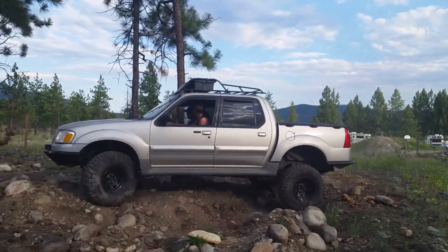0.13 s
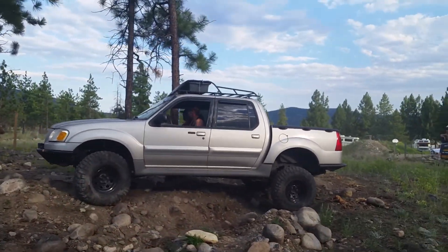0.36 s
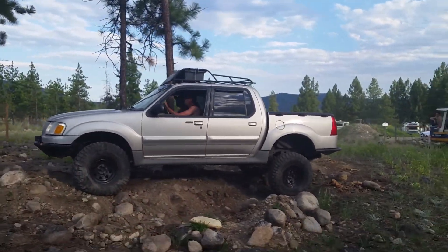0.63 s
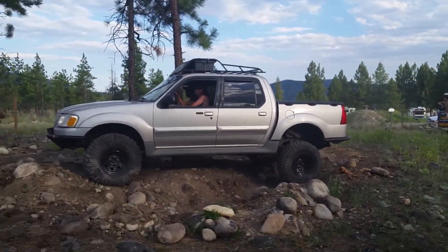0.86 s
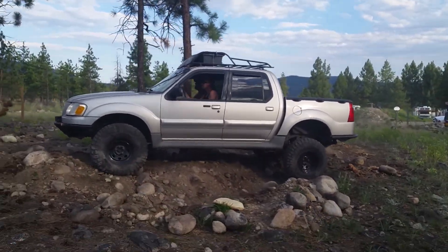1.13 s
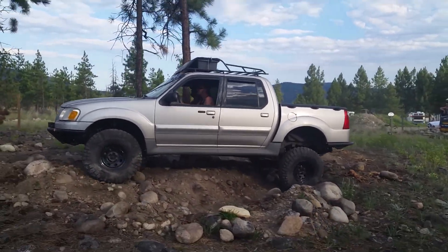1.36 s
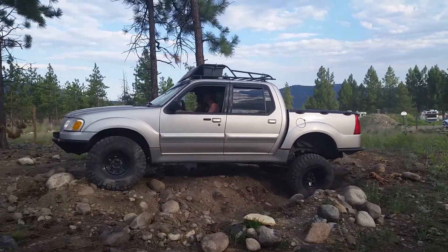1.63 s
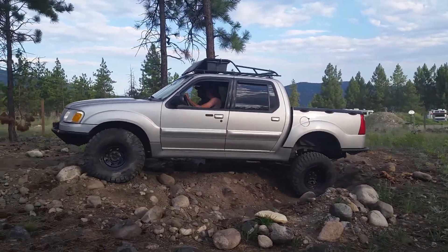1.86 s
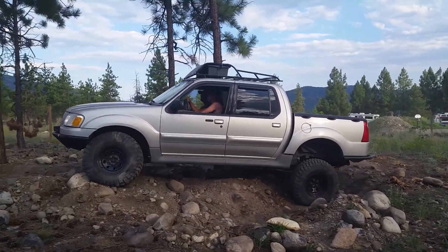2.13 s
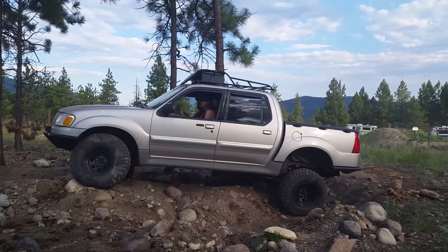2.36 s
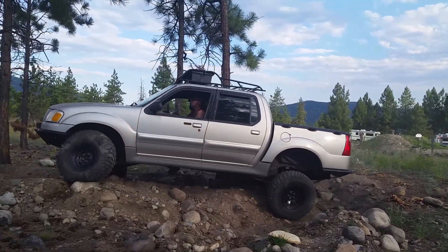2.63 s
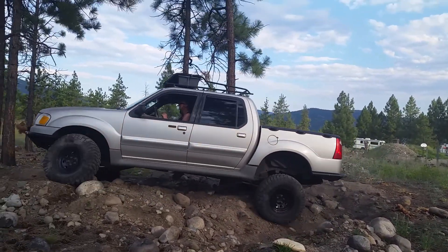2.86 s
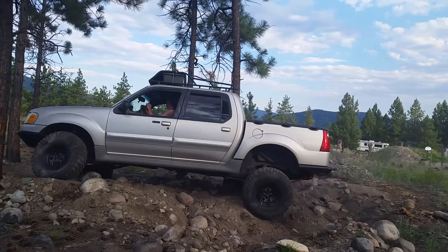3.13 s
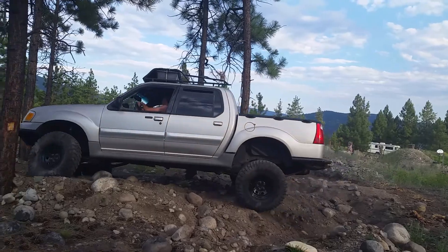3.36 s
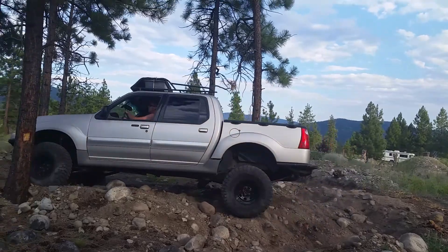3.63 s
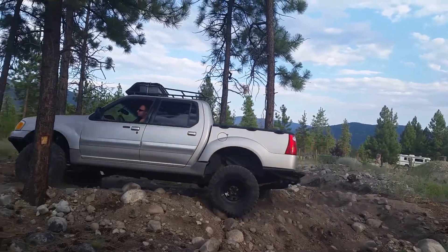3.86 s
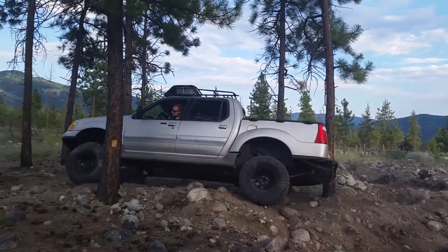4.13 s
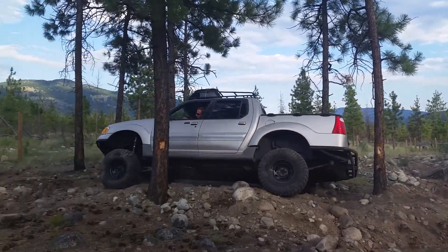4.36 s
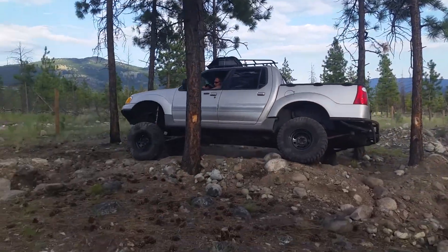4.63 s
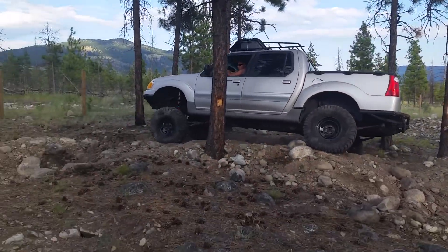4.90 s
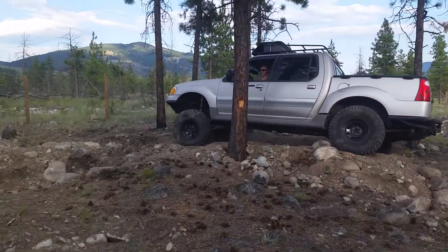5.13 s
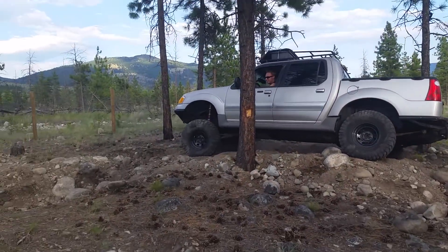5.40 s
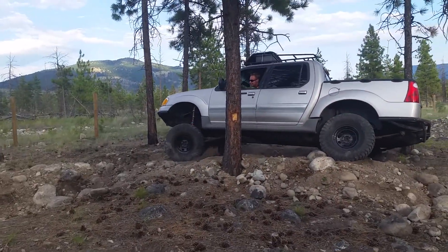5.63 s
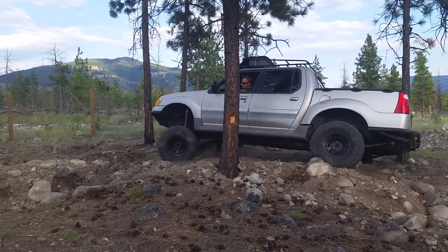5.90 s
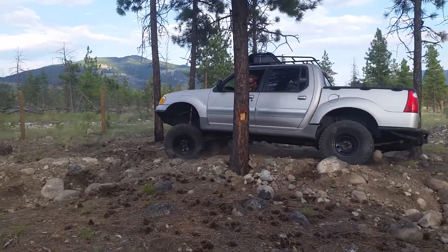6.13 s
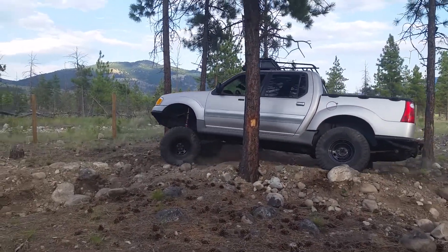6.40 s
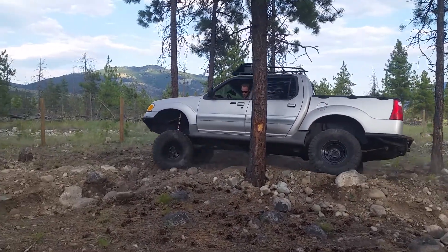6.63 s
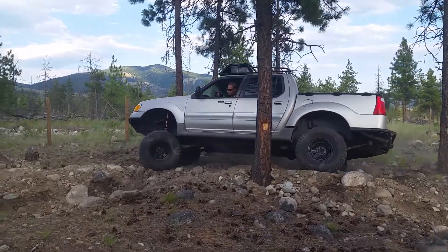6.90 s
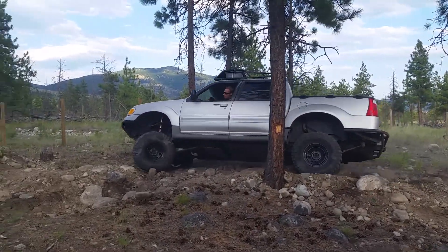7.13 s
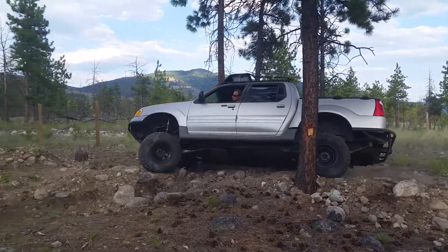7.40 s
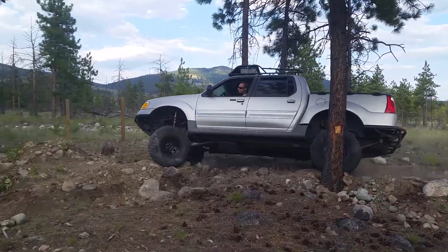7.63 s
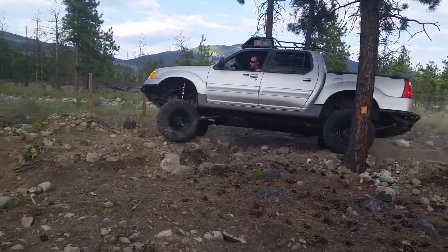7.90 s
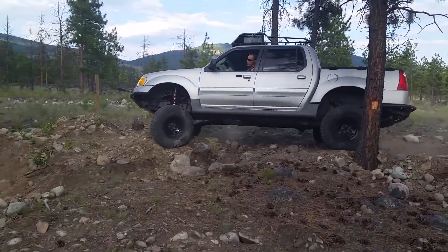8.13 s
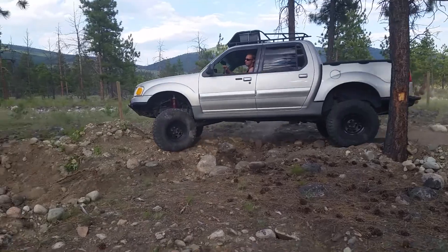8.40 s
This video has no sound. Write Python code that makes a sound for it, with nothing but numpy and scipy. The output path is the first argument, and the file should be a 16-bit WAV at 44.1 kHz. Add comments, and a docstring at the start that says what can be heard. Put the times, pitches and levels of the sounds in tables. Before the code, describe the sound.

Close by on an open forest trail, a pickup starts near idle while wind pops against a handheld phone microphone. Stones click under the tyres and a brake squeaks briefly. The exhaust then swells and falls in throaty surges, with knocks and gravel grinding, sinks to a low idle midway, roars hardest with sharp metal cracks, and keeps revving to the end.

```python
"""A six-cylinder pickup crawls over rocks on a forest trail, a few metres from a phone with two microphone ports.
It starts near idle: wind buffets the right port, stones click under the tyres and a brake squeaks.
Then the engine revs and falls back, two cylinder banks puffing into a booming exhaust; the chassis knocks on rock.
It sinks to idle at 5 s, surges hardest just after 6 s with hard metal knocks, and revs on to the end.
Filtered noise makes gas roar, fan and tyre hiss, and wind; struck modes and noise bursts make the knocks."""
import sys
import numpy as np
from scipy import signal
from scipy.fft import rfft, irfft, next_fast_len
from scipy.io import wavfile
from scipy.ndimage import uniform_filter1d, map_coordinates

SR = 44100
rng = np.random.default_rng(int(sys.argv[2]) if len(sys.argv) > 2 else 0)


def boost(x):
    """Linear amplitude factor 10**(x/20) for a level x in decibels (scalar or array-like)."""
    u = np.asarray(x, float) / 20
    return 10 ** u


def persist_wave(psi):
    """Save psi, clipped to +-1, as 16-bit WAV."""
    counts = np.round(np.clip(psi, -1, 1) * 32767).astype(np.int16)
    wavfile.write(sys.argv[1], SR, np.atleast_2d(counts).T)


N = 375291
TIME = np.arange(N) / SR


def level(x, db):
    """Set the rms level."""
    return x * boost(db) / np.sqrt(np.mean(x ** 2))


def curves(table):
    """Columns of a (t/s, ..) table, one value per sample."""
    s, *columns = np.transpose(table)
    return [np.interp(TIME, s, c) for c in columns]


def colour(x, points):
    """Shape the spectrum by (f/Hz, gain/dB) points, joined on a log frequency axis."""
    size = next_fast_len(N)
    hz, db = np.transpose(points)
    bins_hz = np.arange(size // 2 + 1) * SR / size
    gain = boost(np.interp(np.log(bins_hz + 1), np.log(hz + 1), db))
    return irfft(rfft(x, size) * gain, size)[:N]


def band(x, hz, width):
    """Resonant band-pass, gain 1 at the centre."""
    return signal.lfilter(*signal.iirpeak(min(hz, .4 * SR), hz / width, SR), x)


def walk(rate):
    """Random levels held 1 / rate s and slewed twice; spread near 0.6."""
    k = int(SR / rate)
    held = np.repeat(rng.standard_normal(N // k + 1), k)
    return 0.82 * uniform_filter1d(uniform_filter1d(held, k), k)[:N]


def add(out, s, x, db):
    """Mix x in at time s with the given peak."""
    i = int(s * SR)
    out[i:i + len(x)] += (x * boost(db) / np.abs(x).max())[:N - i]


def fade(t60):
    """Time axis and a decay of 60 dB over t60."""
    t = np.arange(int(t60 * SR)) / SR
    return t, np.exp(-np.log(1000) * t / t60)


def sluggish(x, lag_s):
    """Follow x with a time constant."""
    k = 1 / (max(lag_s, 1 / SR) * SR)
    return x[0] + signal.lfilter([k], [1, k - 1], x - x[0])


def revs():
    """Firing rate of one bank, rounded off by the flywheel, and its octaves above 35 Hz, the reference rate."""
    # engine speed: t/s, firing rate of one bank f/Hz
    bank_rate = [(0, 21), (.59, 22.2), (.88, 22.4), (1.02, 24.6), (1.45, 36.9), (1.56, 38.6), (1.7, 36),
                 (1.9, 29.8), (2.08, 26.8), (2.25, 31), (2.41, 41.6), (2.53, 45), (2.84, 33.8), (3.0, 30.3),
                 (3.14, 33), (3.33, 38.6), (3.46, 41), (3.65, 37), (3.82, 34.3), (3.97, 37.6), (4.2, 45.9),
                 (4.34, 40.8), (4.8, 22), (5.0, 18), (5.11, 22.6), (5.31, 21.5), (5.6, 44.8), (5.76, 53.3),
                 (5.86, 56), (6.12, 61.5), (6.27, 58.4), (6.49, 33.8), (6.71, 25.6), (6.95, 32),
                 (7.13, 40.3), (7.25, 44.6), (7.41, 41.8), (7.59, 35.2), (7.72, 33.6), (7.91, 42.7),
                 (8.1, 47.1), (8.21, 45), (8.4, 34.8), (8.51, 31.9)]
    flywheel_s = .06
    hz = uniform_filter1d(curves(bank_rate)[0], int(flywheel_s * SR), mode="nearest")
    return hz, np.log2(hz / 35)


def buffets():
    """Single eddies pop on the port: a quick shove of the membrane that sags in pitch."""
    # eddies: t/s, peak level/dB before the colouring
    eddy_pops = [(.003, -8), (.09, -12), (.128, -2), (.146, -7), (.157, -3), (.178, -3), (.188, -2),
                 (.226, -4), (.247, -3), (.261, -5), (.37, -10), (.395, -11), (.525, -12), (.578, -8),
                 (.6, -4), (.632, -8), (.675, -10), (.82, -12), (1.075, -11), (1.32, -9), (1.4, -9),
                 (1.5, -10), (1.76, -10), (1.93, -11), (5.19, -14), (5.326, -8)]
    pops = np.zeros(N)
    t, decay = fade(.07)
    sag_s = .004
    for s, peak_db in eddy_pops:
        extra_hz = rng.uniform(100, 450) * boost(peak_db / 2)
        # the extra pitch dies away and leaves 110 Hz
        cycles = extra_hz * sag_s * (1 - np.exp(-t / sag_s)) + 110 * t
        onset = np.minimum(t / .002, 1)
        add(pops, s, np.sin(2 * np.pi * cycles) * decay * onset, peak_db)
    return colour(pops, [(30, -12), (80, 0), (700, 0), (1400, -25), (4000, -50)])


def wind():
    """Turbulence rumbles and pops on the right port; the left is sheltered."""
    # rumble at the right port: t/s, level/dB before the gusts
    wind_level = [(0, -19), (.2, -18), (.5, -21), (.62, -19), (.95, -21), (1.1, -17), (1.3, -21),
                  (1.6, -21), (1.9, -21), (2.1, -26), (2.5, -25), (2.8, -34), (3.0, -22), (3.25, -28),
                  (3.6, -25), (4.1, -30), (4.4, -22), (4.9, -33), (5.3, -20), (5.6, -25), (6.0, -22),
                  (6.45, -20), (7.05, -31), (7.35, -23), (7.6, -32), (8.51, -26)]
    # turbulence spectrum: f/Hz, level/dB per Hz
    gust_spectrum = [(20, -36), (45, -0.5), (100, 2), (150, -4), (300, -15), (600, -57), (1200, -36.5),
                     (3000, -96)]
    gusts_db, gusts_per_s = 1.5, 12
    db = curves(wind_level)[0] + gusts_db * walk(gusts_per_s)
    # each port has turbulence of its own
    lee, luff = (level(colour(rng.standard_normal(N) * boost(1.5 * walk(40)), gust_spectrum), 0)
                 for _ in range(2))
    return np.array([boost(db - 18.0) * lee, boost(db) * luff + buffets()])


def rush():
    """Gas roar, lightly gated by the firings, and hiss of fan and tyres: one direct, two scattered streams."""
    # spectra of gas roar and of hiss: f/Hz, level/dB per Hz
    roar_spectrum = [(180, 2), (300, 1.5), (356, -4), (399, -1.5), (481, -1), (612, -1), (1260, -10.5),
                     (1800, -17), (2340, -51), (3960, -120)]
    hiss_spectrum = [(880, -30.5), (1500, 5), (1670, -2.5), (1820, 7.5), (1950, 2.5), (2150, 6.5),
                     (2650, 5), (3250, 0), (5200, -3), (6260, -14), (7250, -12.5), (8240, -17),
                     (15600, -37.5)]
    # at the reference rate: t/s, roar level/dB, hiss level/dB
    rush_level = [(0, -29.5, -48), (.55, -33.5, -48), (1.2, -35, -48.5), (1.75, -34, -48),
                  (2.3, -34.5, -48.5), (2.8, -35.5, -49), (3.3, -32.5, -48.5), (3.6, -33.5, -49),
                  (3.95, -36.5, -50.5), (4.5, -32.5, -45.5), (5.3, -36.5, -47), (5.62, -34.5, -46.5),
                  (5.76, -32.5, -43.5), (6.5, -34.5, -47.5), (7.0, -33.5, -45.5), (7.5, -32.5, -45.5),
                  (7.75, -32.5, -45), (8.51, -35, -47)]
    hz, octaves = revs()
    roar_db, hiss_db = curves(rush_level)
    # both grow with the revs, in dB per octave, and lag behind them
    roar_db = roar_db + 10 * sluggish(octaves, lag_s=0.1)
    hiss_db = hiss_db + 7 * sluggish(octaves, lag_s=0.078)
    since_firing = 2 * np.cumsum(hz) / SR % 1  # fraction of a firing interval
    puffs = .8 + np.exp(-since_firing / .35)
    gate = puffs * boost(2.6 * walk(25) + 1.23 * walk(150))
    flicker = boost(1.96 * walk(18))
    streams = []
    for _ in range(3):
        roar = level(colour(gate * rng.standard_normal(N), roar_spectrum), 0)
        hiss = level(colour(flicker * rng.standard_normal(N), hiss_spectrum), 0)
        streams.append(boost(roar_db) * roar + boost(hiss_db) * hiss)
    return streams


def stones(out):
    """Stones click under the tyres: very short noise ticks in a broad band, with faint pebbles between."""
    # clicks: t/s, peak level/dB, centre f/Hz
    clicks = [(0.2768, -32, 7830), (.296, -30, 5000), (0.374, -30, 7000), (0.4219, -29, 2620),
              (.444, -28, 2500), (0.5322, -29, 2520), (.545, -30, 3500), (0.5631, -27, 5830),
              (.571, -28, 5500), (0.6414, -21, 4500), (.6674, -29, 5240), (0.7103, -25, 2660),
              (0.7497, -23, 3200), (0.8624, -28, 2520), (1.4461, -20, 2850), (1.4666, -19, 2740),
              (1.6661, -20, 2570), (4.4034, -24, 2570), (4.5221, -22, 2630), (5.1103, -18, 5520),
              (5.1264, -21, 2610), (5.3178, -19, 2660), (5.3274, -22, 5410), (5.9888, -22, 2620),
              (6.2824, -25, 4310), (6.3076, -22, 2600), (6.3204, -14, 8000), (6.4692, -22, 2510),
              (6.5989, -28, 5980), (6.7496, -25, 3500), (7.3567, -27, 2750), (7.4794, -27, 2580),
              (7.5642, -23, 2400), (8.28, -27, 3000), (8.4821, -26, 2510)]
    t, decay = fade(.008)
    # 14 faint pebbles at random moments
    pebbles = [(a * N / SR, -34 + 4 * b, 2500 * 2.5 ** c) for a, b, c in rng.random((14, 3))]
    for s, db, hz in [*clicks, *pebbles]:
        tick = (.5 * rng.standard_normal(len(t)) + 3 * (t == 0)) * decay
        add(out, s, band(tick, hz, .8 * hz) + .12 * band(tick, 7000, 9000), db)


def thumps(out):
    """Blows and creaks of body, springs and axles: a decaying noise push rings a resonance."""
    # blows: t/s, peak level/dB, ring f/Hz, width/Hz of the first filter, t60/s of the push
    blows = [(.3, -41, 2500, 120, .3), (.72, -26, 650, 150, .09), (.735, -29, 1870, 350, .04),
             (2.128, -17, 800, 700, .18), (2.391, -34, 5420, 500, .02), (2.632, -24, 600, 200, .1),
             (3.362, -25, 520, 200, .06), (3.985, -14, 680, 200, .15), (4.02, -24, 1000, 200, .06),
             (4.205, -43, 4200, 100, .2), (4.515, -27, 2250, 200, .08), (4.857, -29, 570, 150, .06),
             (5.14, -25, 600, 200, .07), (6.162, -21, 700, 400, .025), (6.416, -20, 1000, 300, .07),
             (6.6, -30, 1070, 90, .16), (6.749, -30, 1040, 110, .1), (7.731, -16, 620, 220, .14)]
    for s, db, hz, width, t60 in blows:
        t, decay = fade(t60)
        push = rng.standard_normal(SR // 2)[:len(t)] * decay
        # a soft contact leaves no treble
        add(out, s, band(band(push, hz, width), hz, 2 * width), db)


def ring(modes, crack):
    """Struck metal: a broad crack, then decaying modes with chance in strength and phase."""
    t = np.arange(int(.25 * SR)) / SR
    chance = rng.random((len(modes), 2))
    tone = np.zeros(len(t))
    for (hz, db, t60), (a, b) in zip(modes, chance):
        decay = np.exp(-np.log(1000) * t / t60)
        tone += boost(db + 2.5 * a) * np.sin(2 * np.pi * (hz * t + b)) * decay
    above_thud = signal.butter(2, 1500, "high", fs=SR)
    burst = signal.lfilter(*above_thud, rng.standard_normal(len(t)))
    return tone + crack * burst * np.exp(-t / .007)


def knocks(out):
    """Metal strikes rock: the frame rings after a hard crack, a shackle once with a softer one."""
    # frame hits: t/s, peak level/dB
    frame_hits = [(2.129, -10), (4.469, -18), (4.486, -19), (6.3425, -7), (6.3905, -15)]
    # modes of frame and shackle: f/Hz, level/dB before the chance rise, t60/s
    frame_modes = [(2160, -6, .04), (2900, -8, .03), (3900, -4, .025), (4834, -8, .03), (5416, 0, .045),
                   (6826, -9, .025), (8400, -7, .03), (9600, -6, .03), (13140, -10, .03)]
    shackle_modes = [(2950, -10, .18), (4328, -4, .12), (5879, -4, .09), (7041, -14, .15), (9561, -20, .1)]
    for s, db in frame_hits:
        add(out, s, ring(frame_modes, crack=1.5), db)
    add(out, 6.238, ring(shackle_modes, crack=.6), -16)


def grinds(out):
    """Gravel grinds under a slipping tyre and something rattles near 600 Hz: dense grains of very uneven size,
    in a band that narrows as its centre falls."""
    # slips: start t/s, length/s, rms level/dB before fading in and out, centre f/Hz
    slips = [(0.278, 0.0099, -41, 5000), (0.403, 0.063, -42.5, 3000), (0.696, 0.1, -50, 2500),
             (1.436, .035, -45, 3500), (2.141, 0.04, -44, 1600), (2.16, 0.057, -40, 2700),
             (2.523, 0.48, -36.5, 584), (2.659, 0.027, -48, 6040), (3.4, 0.24, -37, 606),
             (4.076, .12, -52, 4960), (4.399, 0.16, -40, 2200), (4.4, 0.277, -40, 1020),
             (5.096, 0.049, -42, 4860), (5.714, .28, -44.5, 9500), (6.339, 0.075, -38, 3300),
             (6.462, 0.02, -32, 2480), (6.579, 0.038, -43, 7000), (7.558, 0.014, -30, 3570)]
    grains = rng.standard_normal(N) * boost(4.0 * walk(300))
    edge_s = .012
    for s, length, db, hz in slips:
        shape = np.clip(np.minimum((TIME - s) / edge_s, (s + length - TIME) / edge_s), 0, 1)
        narrow = band(grains, hz, min(.6, hz / 3500) * hz)
        out += shape * level(band(narrow, hz, min(2.0, hz / 1500) * hz), db)


def trail():
    """Clicks, blows, knocks and grinding of wheels and chassis on the rocks, under one overall colour."""
    out = np.zeros(N)
    stones(out)
    thumps(out)
    knocks(out)
    grinds(out)
    return colour(out, [(10, 0), (1200, 0), (2500, 4), (5500, 3), (8000, -1), (11000, -4), (16000, -18)])


def brake():
    """Pad and disc sing a falling tone of wavering strength."""
    # squeaks: peak t/s, peak level/dB before the waver, attack/s over 60 dB, t60/s, f/Hz at the peak
    squeaks = [(.774, -14, .014, .06, 9720), (.803, -31, .01, .05, 9650), (.925, -29, .05, .09, 9650)]
    sag_hz_per_s = 3500
    out = np.zeros(N)
    for s, peak_db, attack, t60, hz in squeaks:
        t = TIME - s
        db = peak_db - 60 * np.where(t < 0, -t / attack, t / t60)
        tone = np.sin(2 * np.pi * (hz - sag_hz_per_s * t / 2) * t)
        out += boost(db + 3.2 * walk(300)) * tone
    return out


def exhaust():
    """The banks fire in turn, one stronger; puffs and gas turbulence ring the pipe."""
    # firings: t/s, strength level/dB before a fixed gain
    throttle = [(0, -23), (.55, -25), (.76, -15), (.93, -14.5), (1.0, -20), (1.37, -9.5), (1.71, -11.5),
                (1.9, -20.5), (2.3, -10.5), (2.58, -11), (2.74, -14.5), (3.03, -19), (3.19, -11),
                (3.59, -11.5), (3.9, -10), (4.26, -9.5), (4.45, -21.5), (4.6, -24.5), (4.99, -28),
                (5.2, -20.5), (5.3, -16.5), (5.39, -17.5), (5.48, -9), (5.93, -8), (6.22, -11.5),
                (6.5, -23.5), (6.62, -28.5), (6.76, -22), (7.02, -12), (7.33, -11.5), (7.49, -17.5),
                (7.75, -13), (8.04, -9.5), (8.2, -10), (8.34, -18.5), (8.51, -20)]
    # bank against bank: t/s, level/dB of the alternating part of the puffs against the common part
    imbalance = [(0, -8), (.58, -11), (.7, -10), (1.1, -1.5), (2.4, -2), (4.2, -3.5), (4.95, -20),
                 (5.25, -10), (5.7, -3.5), (6.0, -28), (6.2, 2), (6.5, -23), (6.8, -4), (8.51, -6)]
    # scatter of the firings, high at idle and on the overrun: t/s, level/dB
    unevenness = [(0, 3), (.6, 2), (1.2, .7), (4.3, .7), (4.45, 2.5), (5.3, 2), (5.5, .8), (6.25, .8),
                  (6.35, 4), (6.75, 3), (6.95, .6), (8.51, .6)]
    # pipe modes: f/Hz, width/Hz of the first filter, level/dB
    pipe_modes = [(78.7, 37.6, 3.5), (134.3, 24.65, 17), (229.8, 61.5, -5.5)]
    hz, octaves = revs()
    (throttle_db,), (imbalance_db,), (scatter_db,) = curves(throttle), curves(imbalance), curves(unevenness)
    # lowest mode: -16.5 dB per octave of revs, no further gain below -0.37 octaves,
    # and 3 dB per octave-a-second of acceleration
    accel = np.clip(np.gradient(octaves) * SR, -1.8, 2.6)
    boom_db = -1 - 16.5 * np.maximum(octaves, -0.37) + 3 * accel
    at = np.flatnonzero(np.diff(np.floor(2 * np.cumsum(hz) / SR)))  # samples at which a bank fires
    burn, timing = rng.standard_normal((N // 200, 2))[:len(at)].T
    # an uneven burn is also a little early or late
    shift = (0.00026 * SR * scatter_db[at] * timing).astype(int)
    when = np.clip(at + shift, 0, N - 1)
    common, odd = np.zeros((2, N))
    common[when] = boost(throttle_db[at] + 37.0 + scatter_db[at] * burn)
    odd[when] = common[when] * boost(imbalance_db[at]) * (-1.) ** np.arange(len(at))
    eddies = boost(throttle_db - 11) * rng.standard_normal(N)
    # the top mode sits behind the junction, where the banks have evened out and eddies dominate
    drives = boost(boom_db) * (common + odd), -(common + odd + eddies), common + boost(25.5) * eddies
    return sum(boost(db) * band(band(x, f, w), f, 1.465 * w) for x, (f, w, db) in zip(drives, pipe_modes))


def scatter(x, t60):
    """Ground and trunks return a short wash, different at each port."""
    t, decay = fade(t60)
    tails = rng.standard_normal((2, SR // 2))[:, :len(t)] * decay
    thin = colour(x, [(100, -37), (500, -26.0), (2000, 15), (16000, 18.0)])
    return np.array([signal.fftconvolve(thin, k / np.sqrt(np.sum(k ** 2)))[:N] for k in tails])


def scene():
    """Direct sound reaches the left port first; each port has its own colour."""
    # the right port hears the truck later as it moves round: t/s, lag/ms
    port_lag = [(0, 0.14), (3, 0.2), (4.3, 0.16), (5.2, 0.068), (6.2, 0.11), (8.51, 0.086)]
    # port colours: f/Hz, left minus right level/dB
    port_colour = [(60, -1), (110, -1.5), (200, -1), (380, -1.5), (700, -1.5), (1290, 0), (2380, -6.5),
                   (4400, -6), (8120, 17), (15000, 4)]
    steady, *scattered = rush()
    hits = trail() + brake()
    direct = exhaust() + steady + hits
    lag_ms, = curves(port_lag)
    late = map_coordinates(direct, [np.arange(N) - lag_ms * SR / 1000], order=3, mode="nearest")
    # long waves reach both ports alike, so the scattered streams are thin in the bass
    thinning = [(300, -27.5), (1000, -8.0), (2000, 2.0), (4000, 1.5), (9000, 14), (13000, 15.5)]
    wash = np.array([colour(x, thinning) for x in scattered])
    echo = scatter(hits, t60=.03)
    left, right = np.array([direct, late]) + boost(1) * wash + boost(-19) * echo
    hz, db = np.transpose(port_colour)
    return np.array([colour(left, np.c_[hz, db / 2]), colour(right, np.c_[hz, -db / 2])]) + wind()


def top_cut(x):
    """Nothing passes above the cut-off."""
    return signal.sosfilt(signal.butter(12, 15710, fs=SR, output="sos"), x)


def record(dry):
    """The phone rounds the loudest peaks."""
    rounded = np.tanh(0.81 * dry) / 0.78
    return top_cut(rounded)


dry = scene()
out = record(dry)
persist_wave(out)
```